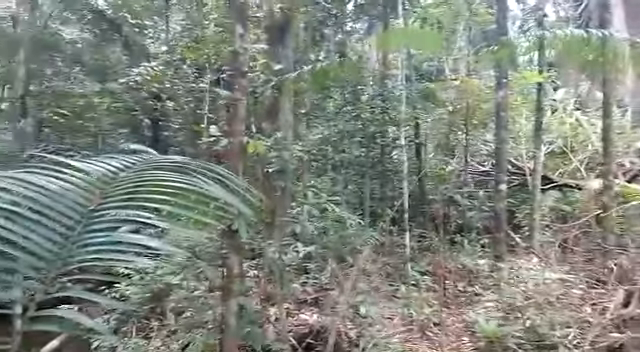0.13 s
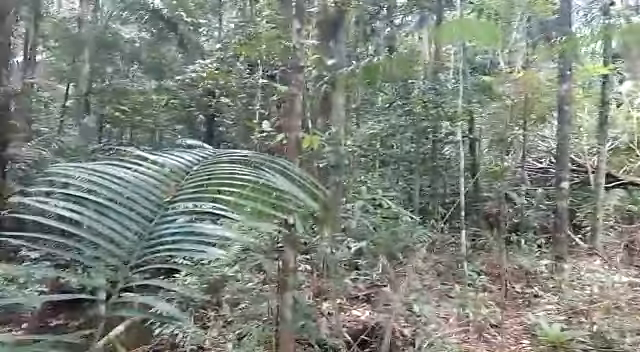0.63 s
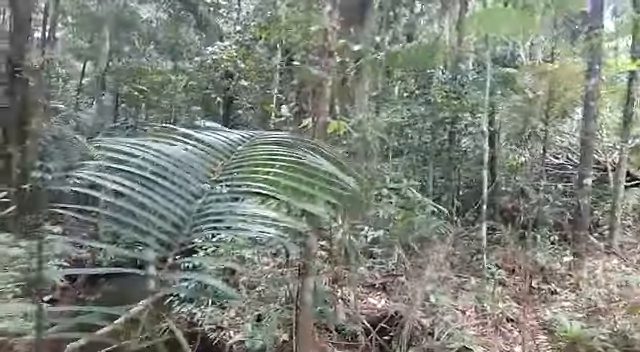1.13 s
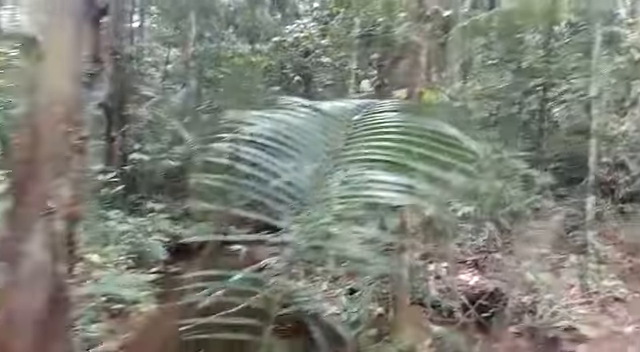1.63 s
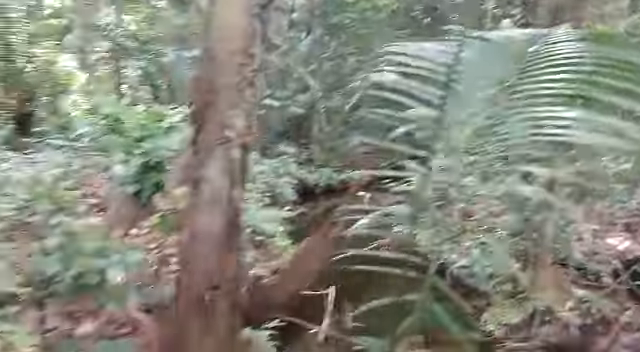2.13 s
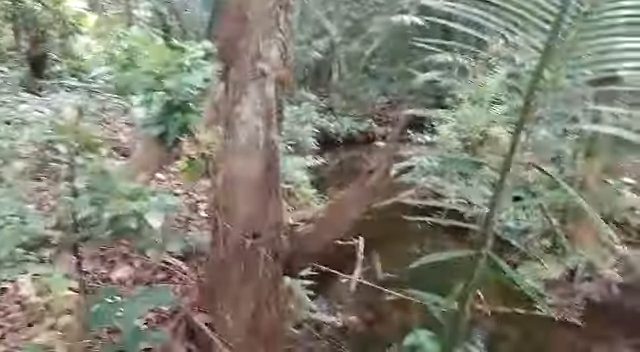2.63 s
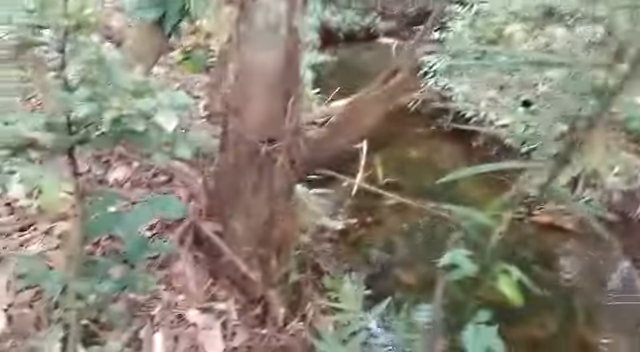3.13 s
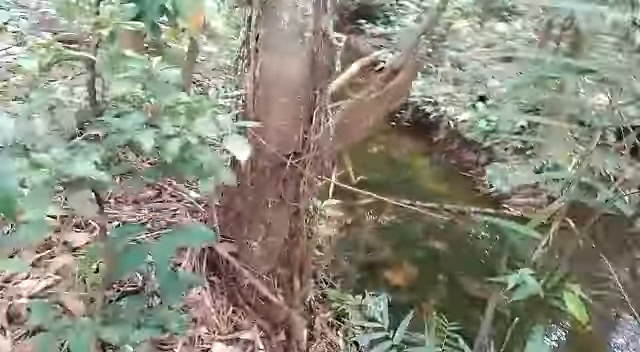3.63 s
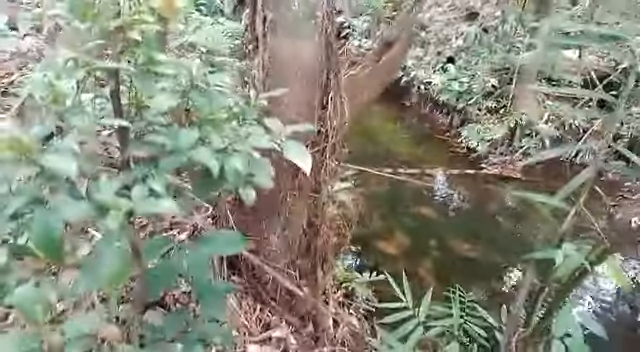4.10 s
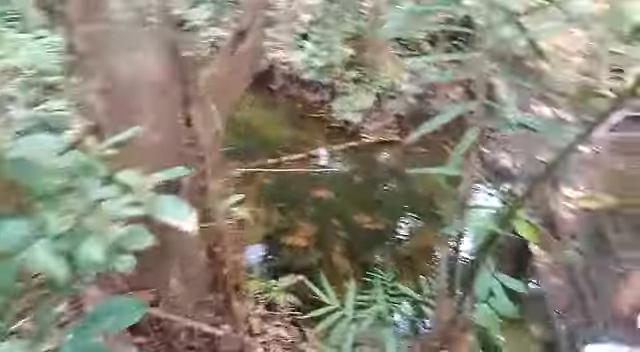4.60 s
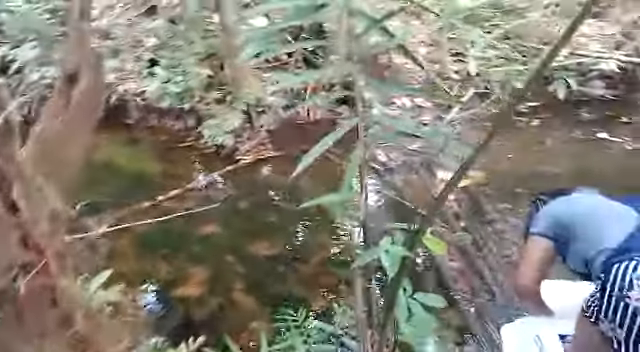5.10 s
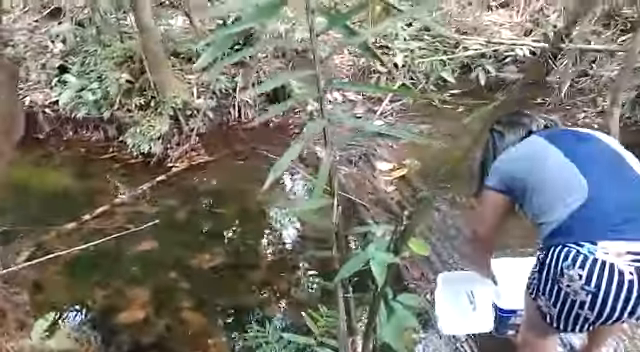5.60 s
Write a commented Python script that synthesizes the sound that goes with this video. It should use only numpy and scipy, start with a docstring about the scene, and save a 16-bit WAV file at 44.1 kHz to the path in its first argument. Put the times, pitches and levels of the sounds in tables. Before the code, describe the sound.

Outdoors in forest undergrowth, uneven swilling of water in a small plastic container comes first, with hollow gulps and bright spray. After a lull, heavy leaf crunches arrive near three and a half, four and five seconds, trailing crackles and twig snaps. Distant hiss and high insects continue; the handheld microphone sounds thin and bright.

```python
"""Water rushes, gulps and booms in a swilled hollow plastic tub: noise and grains ring its modes.
Close by, steps crush dry leaves: short cracks and hiss swell with the load of each foot.
Single twig and leaf snaps, made of rough decaying sines, stand out over the crush.
Far hiss and insects in narrow noise bands lie under it all, out in forest undergrowth.
A small bright microphone hears it, over faint low bass noise that rises with the low near sounds."""
import sys
import numpy as np
from scipy import signal
from scipy.fft import rfft, irfft, next_fast_len
from scipy.io import wavfile
from scipy.ndimage import uniform_filter1d, map_coordinates

SR = 44100
rng = np.random.default_rng(int(sys.argv[2]) if len(sys.argv) > 2 else 0)


def persist_wave(psi):
    """Save psi, clipped to +-1, as 16-bit WAV."""
    counts = np.round(np.clip(psi, -1, 1) * 32767).astype(np.int16)
    wavfile.write(sys.argv[1], SR, np.atleast_2d(counts).T)


def ratio(d):
    """dB to gain"""
    e = np.asarray(d, float) / 20
    return 10 ** e


N = 253134

# far forest hiss: (frequency [Hz], relative density [dB])
FAR_HISS = [(120, -53), (200, -8.5), (366, -3), (964, -10), (1060, -16), (1860, -8.5), (2590, -30.5),
            (5680, -15), (6570, -1.5), (7330, -6.5), (8180, -24), (15800, -19)]
# insect bands that waver in level throughout: (centre [Hz], width [Hz], level [dB])
INSECTS = [(6720, 94, -79), (8300, 550, -70.5)]
# one nearer insect: (time [s], level [dB])
NEAR_INSECT = [(0, -81), (1.8, -79), (2.0, -64), (2.9, -61.5), (3.2, -73.5), (3.5, -72), (5.74, -64)]
# scatter off trunks: (frequency [Hz], 60 dB decay time [s])
TRUNK_DECAY = [(300, 0.15), (3000, 0.088), (12000, 0.05)]

# steps: (first touch [s], time to full weight [s], hold [s], crush [dB], rustle of settling leaves [dB],
# rustle fade [dB/s])
STEPS = [(2.476, 0.066, 0.0068, -52, -55, 60), (3.461, 0.069, 0.0084, -38.5, -53, 27),
         (3.499, 0.055, 0.005, -24, -41.5, 75), (4.234, 0.032, 0.0075, -47, -78, 36),
         (4.299, 0.019, 0.0089, -31, -44.5, 51), (4.969, 0.061, 0.055, -25, -39.5, 25.5)]
# crisp part of the leaves: (frequency [Hz], relative density [dB])
LEAF_CRISP = [(1470, -70), (2500, -10.5), (3860, -6), (4860, -8.5), (9020, 3), (10400, 4), (12700, -11.5),
              (14900, -13), (16100, -8), (16600, -62)]
# duller body of the leaves: (frequency [Hz], relative density [dB])
LEAF_BODY = [(180, -8), (300, -13), (813, -11.5), (968, -14), (1180, -14.5), (1760, -11.5), (3500, -9),
             (4550, -32), (7700, -120)]
# single snaps: (time [s], relative level [dB], ring pitch [Hz], relative knock level [dB])
SNAPS = [(0.053, -40, 4120, -1), (0.5494, -27, 10400, -36), (0.775, -33.5, 9200, -30),
         (0.7901, -27, 9260, -43), (0.802, -29, 9900, -33), (0.949, -28, 10240, -44),
         (1.037, -27.5, 9820, -14), (1.5374, -26, 10160, -39), (1.6518, -30, 9830, -24),
         (1.729, -27.5, 8280, -21), (2.5035, -25.5, 3430, -21), (2.5323, -25.5, 9020, -2),
         (2.6618, -23.5, 10250, -26), (2.978, -52, 9100, 0), (3.03, -46.5, 9600, 0), (3.1, -46, 9500, -10),
         (3.2892, -41.5, 1750, -21), (3.41, -49, 7500, -2), (3.549, -9, 7520, -23),
         (3.6402, -19.5, 9300, -3), (3.6587, -20.5, 10480, -28), (3.7042, -18.5, 8340, -9),
         (3.7386, -13.5, 9690, -41), (3.8564, -27.5, 9060, -3.5), (3.8747, -30, 3670, -33),
         (3.9987, -24.5, 9120, -15), (4.0114, -26, 9500, -4), (4.0292, -29, 9400, -19),
         (4.105, -23.5, 9200, -45), (4.1653, -35.5, 9530, 0.5), (4.335, -19, 6820, -25),
         (4.353, -31, 1480, -17), (4.4264, -16, 10150, -19), (4.43, -7, 9850, -40), (4.51, -36, 7940, -29),
         (4.566, -25.5, 9660, -32), (4.587, -23, 10080, -9.5), (4.652, -25.5, 8280, -38),
         (4.7162, -23.5, 8300, -40), (4.885, -47.5, 2780, -18), (4.907, -54, 7060, -27),
         (4.916, -33.5, 9760, -30), (5.0797, -10.5, 9030, -36), (5.192, -20, 7280, -6),
         (5.2088, -13.5, 10880, -5), (5.229, -19.5, 8070, -26), (5.3062, -22, 9150, -2),
         (5.3265, -13, 9650, -31), (5.33, -14, 9080, -26), (5.342, -18, 10220, -19),
         (5.375, -24, 10700, -23), (5.4119, -27, 8860, 9.5), (5.4306, -25.5, 8900, -3),
         (5.459, -16, 9200, -6), (5.4756, -21.5, 8250, 2), (5.5159, -22.5, 10730, -32),
         (5.545, -26, 9550, -23), (5.594, -34, 9900, -28), (5.6471, -28.5, 10400, -44)]

# swilling strokes, each with rows: (time [s], rush in the middle modes [dB], spray in the high modes [dB]),
# as relative levels
STROKES = [
    [(0.0, -65, -60), (0.036, -69, -66), (0.056, -62.5, -52), (0.2, -63, -55.5), (0.25, -61.5, -50.5),
     (0.68, -57, -48.5), (0.99, -59.5, -51.5), (1.08, -61, -55.5), (1.19, -59, -50.5), (1.31, -57.5, -52),
     (1.46, -62, -58.5)],
    [(1.46, -61, -49), (1.53, -57, -52), (1.69, -58.5, -46.5), (1.8, -56.5, -48), (2.05, -54.5, -51),
     (2.2, -57.5, -54.5), (2.36, -65, -60), (2.42, -64, -69), (2.47, -69, -90)],
    [(2.47, -60, -88), (2.53, -59, -45.5), (2.73, -59, -57.5), (2.92, -58.5, -63), (2.96, -67, -85),
     (3.04, -72, -93), (3.12, -104, -80)],
    [(3.91, -69, -75), (3.932, -41.5, -37), (3.958, -51, -41), (4.172, -69.5, -57.5), (4.2, -100, -58)],
]
# the tub's middle modes as tilt and fill change, one set a stroke: (centre [Hz], width [Hz], level [dB])
TUB_MODES = [
    [(710, 71, 5), (1400, 144, 6), (1850, 150, 5.5), (2485, 144, 6.5), (3020, 320, 0)],
    [(795, 116, 8.5), (1080, 100, 10), (1850, 270, 7.5), (2980, 68, -16), (2300, 1700, 5)],
    [(1264, 240, -5), (1566, 110, 7), (1756, 60, 6), (3370, 250, 1), (4540, 230, -4)],
    [(1090, 37, -1.5), (2020, 95, -10), (2260, 320, -8.5), (3840, 370, -0.5), (4550, 170, -3)],
]
# unsteadiness of the middle modes: one spread [dB] a stroke
MODE_CHURN = [2.5, 2.5, 1.2, 2.2]
# boom of the air inside against the rush: one level [dB] a stroke
AIR_BOOM = [-17, -12.5, -20, -13]
# the tub's high modes: (centre [Hz], width [Hz], level [dB])
SPRAY_MODES = [(5070, 730, -2.5), (5706, 66, -1), (6124, 134, 1), (7430, 46, -29), (7250, 210, -5),
               (9000, 25, 7.5), (8730, 470, 1.5), (8860, 120, -5), (10020, 800, 6.5)]
# finest spray near 11 kHz: (time [s], level against the spray [dB])
SHEEN = [(0, -15), (.7, -21), (.78, -8), (1.4, -24), (1.5, -15), (1.9, -10), (2.05, -4), (2.25, -10),
         (2.9, -37)]
# waves hitting the wall: (crest [s], swell over the rush [dB])
WAVES = [(0.16, 8.5), (0.224, 12), (0.437, 7.5), (0.702, 1), (1.004, 6), (1.124, 15), (1.17, 3.5),
         (1.262, 8.5), (1.492, 6), (1.616, 6), (1.743, 5.5), (1.93, 5.5), (2.082, 10.5), (2.535, 2)]
# pockets of air slapped shut, deep booms to small gulps: (time [s], relative level [dB], pitch [Hz])
GULPS = [(0.049, -42.5, 763), (0.217, -55, 282), (0.219, -42.5, 726), (0.324, -43, 2340),
         (0.436, -49, 2520), (0.635, -46, 485), (0.652, -34.5, 266), (0.7, -40, 736), (0.7, -47.5, 261),
         (0.774, -37, 1790), (0.972, -44.5, 259), (0.997, -49.5, 296), (1.005, -40, 1830),
         (1.053, -57, 475), (1.125, -45, 270), (1.165, -38.5, 1440), (1.223, -54, 267), (1.26, -41, 1850),
         (1.309, -39.5, 1810), (1.317, -52, 267.5), (1.394, -47, 860), (1.475, -44, 1020),
         (1.484, -43, 298), (1.736, -43, 268), (1.927, -44.5, 341), (2.052, -44.5, 1090),
         (2.06, -42.5, 315), (2.099, -40, 307), (2.137, -44.5, 392), (2.263, -52, 530), (2.333, -53, 468),
         (2.338, -37, 3520), (3.924, -37.5, 292), (4.692, -52.5, 272)]

# tone of all that is heard, bright on top, with a dip near 170 Hz and a steep end above 16 kHz:
# (frequency [Hz], gain [dB])
HEARD_TONE = [(60, -1), (170, -13), (230, -6), (11000, 2), (13000, 4), (15800, -4), (16300, -50)]
# faint low bass noise: (frequency [Hz], relative density [dB])
BASS_NOISE = [(20, 4.5), (60, 1), (100, 5.5), (140, -11), (200, -29), (400, -120)]


def unit(x):
    """Scales a sound to rms 1."""
    return x / np.sqrt(np.mean(x ** 2) + 1e-20)


def along(points, hz):
    """Reads (frequency [Hz], value) points on a log frequency axis."""
    f, v = np.transpose(points)
    return np.interp(np.log(hz + 1), np.log(f + 1), v)


def curves(rows):
    """One value per sample for each column, and a soft gate that is shut outside the table."""
    s, *columns = np.transpose(rows)
    t = np.arange(N) / SR
    inside = ((t >= s[0]) & (t <= s[-1])) * 1.
    gate = uniform_filter1d(inside, size=600, mode="nearest")
    return [np.interp(t, s, column) for column in columns], gate


def wobble(rate):
    """A smooth random curve with the given number of knots a second."""
    return map_coordinates(rng.standard_normal(N // 100), [np.arange(N) * rate / SR])


def filtered(x, response):
    """Shapes a sound by a complex response of frequency."""
    m = next_fast_len(N + 8192)
    return irfft(rfft(x, m) * response(np.fft.rfftfreq(m, 1 / SR)), m)[:N]


def bass_cut(x, hz):
    """Second-order high-pass, as for a source too small to radiate much bass."""
    return filtered(x, lambda f: (1j * f / (hz + 1j * f)) ** 2)


def modes(table):
    """Causal response of a set of resonances, alternating in sign."""
    def response(f):
        total = 0
        for k, (centre, width, db) in enumerate(table):
            loss = 1j * f * width
            total = total + (-1) ** k * ratio(db) * loss / (centre * centre - f * f + loss)
        return total
    return response


def noise():
    """Fresh white noise."""
    return rng.standard_normal(N)


def grains(centre_hz, spread, cycles, uneven_db, count, size=96):
    """Scattered short damped sines of log-normal pitch and long-tailed size, rms 1."""
    when, z, e = rng.random(count), rng.standard_normal(count), rng.exponential(size=count)
    hz = np.clip(centre_hz * np.exp(spread * z), 700, 15000)[:, None]
    k = np.arange(size)
    turns = hz * k / SR
    gain = ratio(uneven_db * np.minimum(e, 4.5))[:, None]
    fade = np.exp(-turns / cycles) * np.cos(np.pi * k / size / 2)
    wave = gain * np.sin(2 * np.pi * turns) * fade
    at = (when * N).astype(int)[:, None] + k
    return unit(np.bincount(at.ravel(), wave.ravel(), N + size)[:N])


def rough_sine(hz, t, steps, roughness):
    """A sine whose phase wanders in random steps of the given size [rad]."""
    return np.sin(2 * np.pi * hz * t + roughness * np.cumsum(steps))


def add(track, s, sound):
    """Mixes a sound in at a time."""
    part = track[round(s * SR):][:len(sound)]
    part += sound[:len(part)]


def narrow_band(hz, width):
    """Noise rung through one resonance twice, rms 1."""
    return unit(filtered(noise(), lambda f: modes([(hz, width, 0)])(f) ** 2))


def forest():
    """Smooth far hiss, with insects singing in narrow unsteady bands."""
    hiss = unit(filtered(noise(), lambda f: ratio(along(FAR_HISS, f))))
    far = ratio(-67.5 + 3.3 * wobble(3.43)) * hiss
    (near_db,), _ = curves(NEAR_INSECT)
    chorus = sum(ratio(db + 2.1 * wobble(12)) * narrow_band(hz, width) for hz, width, db in INSECTS)
    return far + chorus + ratio(near_db + 0.96 * wobble(12)) * narrow_band(9000, 190)


def trunks(x):
    """Scatter off trunks: a short diffuse tail of noise, treble dying first."""
    hz, t, z = signal.stft(rng.standard_normal(SR // 4), SR, nperseg=256)
    decay = ratio(-60 * t / along(TRUNK_DECAY, hz)[:, None])
    tail = signal.istft(z * decay, SR, nperseg=256)[1]
    return signal.fftconvolve(x, tail / np.linalg.norm(tail))[:N]


def patchy(x, depth_db):
    """Random gain patches over time and pitch: different leaves sound in turn."""
    z = signal.stft(x, nperseg=256)[2]
    field = uniform_filter1d(rng.standard_normal(z.shape), size=5, axis=0)
    field = uniform_filter1d(field, size=3, axis=1)
    return unit(signal.istft(z * ratio(depth_db * unit(field)), nperseg=256)[1][:N])


def footfalls(crush_db, curve, settle_db, fade):
    """Gain of all steps: touch, load, hold and release, then leaves that settle slowly."""
    touch_db, touch_s = -68, 0.0035  # level before crush_db, and rise, of the first touch
    release_db_per_s, settle_s, rest_db = 445, 0.19, -70.5
    t, power = np.arange(N) / SR, 0
    for s, rise, hold, peak, rustle, db_per_s in STEPS:
        load = np.clip((t - s) / rise, 0, 1) ** curve
        touch = min(touch_db, peak)
        since_hold = t - s - rise - hold
        press = touch + (peak - touch) * load - release_db_per_s * np.maximum(since_hold, 0)
        settle = rustle - fade * db_per_s * np.maximum(since_hold - settle_s, 0)
        begun = np.clip((t - s) / touch_s, 0, 1)
        power = power + (begun * ratio(press + crush_db)) ** 2
        power = power + (load ** 2 * ratio(settle + settle_db)) ** 2
    rest = ratio(rest_db + settle_db) ** 2 * (t > STEPS[0][0])
    return np.sqrt(power + rest)


def leaves():
    """Dense one-cycle cracks over a fine hiss; the slow bending of leaves gives a duller body."""
    level = footfalls(0, 0.37, 0, 1)
    bend = footfalls(-11.5, 0.23, -12.5, 2.05)  # the body leads the cracks and fades faster
    # a hard crush merges the cracks into a roar
    dense = np.clip((20 * np.log10(level + 1e-9) + 42) / 20, 0, 1)
    cracks = grains(7550, 0.47, cycles=0.68, uneven_db=5.0, count=10000)
    mix = ((0.7 + 0.6 * dense) * noise() + cracks) / (1 + .5 * dense)
    crisp = patchy(filtered(mix, lambda f: ratio(along(LEAF_CRISP, f))), depth_db=2.5)
    dull = grains(1740, 0.31, cycles=9.9, uneven_db=1, count=4000)
    dull_mix = 3.27 * noise() + dull + .5 * cracks
    body = patchy(filtered(dull_mix, lambda f: ratio(along(LEAF_BODY, f))), depth_db=1.5)
    # cracks come in bunches, less so in a dense crush
    clumps_db = np.clip(1 - 0.62 * dense, .2, 1) * (2.06 * wobble(54) + 0.68 * wobble(180))
    crush = ratio(clumps_db) * (level * crisp + bend * body)
    return bass_cut(crush, 450)  # leaves radiate little bass


def snaps():
    """Each snap is a crack of rough ringing, a duller knock, and a fizz of splinters."""
    out, t = np.zeros(N), np.arange(SR // 20) / SR
    rise = 1 - np.exp(-t / 0.0003)
    ring_t60, knock_t60, splinter_t60 = 0.0068, 0.0031, 0.021  # [s]
    for s, db, hz, knock_db in SNAPS:
        chance = rng.standard_normal((3, len(t)))
        ring = rough_sine(hz, t, chance[0], 0.33) * ratio(-60 * t / ring_t60)
        knock = rough_sine(3200, t, chance[1], 0.47) * ratio(knock_db + 2.5 - 60 * t / knock_t60)
        fizz = ratio(-60 * t / splinter_t60 + 0.75 * chance[0])
        splinters = 0.26 * rough_sine(hz, t, chance[2], 0.634) * fizz
        add(out, s, ratio(db + 3.5) * rise * (ring + knock + splinters))
    # little bass from thin leaves, little above their ring
    return bass_cut(filtered(out, lambda f: 0.048 + 1 / (1 + (f / 12000) ** 8)), 1100)


def sloshed(x, table, own_db, drift):
    """Each mode swells and fades by itself, and all slide a little in pitch as the water shifts."""
    rings = 0
    for k, mode in enumerate(table):
        rings = rings + ratio(own_db * wobble(16)) * filtered(x, modes([mode])) * (-1) ** k
    slide = np.cumsum(1 + drift * wobble(3.3))
    return unit(map_coordinates(rings, [slide * (N - 1) / slide[-1]], mode="reflect"))


def tub_spray(splash):
    """Fine spray excites the high modes, with a sheen of the finest spray on top."""
    bright = filtered(splash, lambda f: modes([(7500, 6000, 0)])(f) / (1 + (f / 10600) ** 16))
    spray = sloshed(bright, SPRAY_MODES, own_db=3, drift=.014)
    (sheen_db,), _ = curves(SHEEN)
    sheen = unit(filtered(splash, lambda f: modes([(11000, 1600, 0)])(f) ** 3))
    return spray + ratio(sheen_db) * sheen


def wave_swell():
    """Each wave hitting the wall lifts the level in a quick triangle [dB]."""
    t, rise_s, fall_s = np.arange(N) / SR, 0.024, 0.026
    return sum(db * np.interp(t, [s - rise_s, s, s + fall_s], [0, 1, 0]) for s, db in WAVES)


def swilling():
    """Turbulent water excites the tub's modes stroke by stroke, and its slaps boom the air inside."""
    out = np.zeros(N)
    splash = noise() + 0.61 * grains(3150, 0.53, cycles=0.48, uneven_db=7.5, count=9000)
    # sparse bubbles and knocks of water on the wall
    slaps = noise() + 0.39 * grains(1710, 0.459, cycles=5.9, uneven_db=2.5, count=1200, size=400)
    boom = narrow_band(285, 110)
    spray = tub_spray(splash)
    surge = wobble(18)  # the water surges unevenly, in all modes at once
    wave_db = wave_swell()
    for rows, shape, churn_db, air_db in zip(STROKES, TUB_MODES, MODE_CHURN, AIR_BOOM):
        (rush_db, spray_db), gate = curves(rows)
        boom_db = rush_db + air_db + 1.5 * wave_db  # waves swell the boom most, the spray least
        rush = sloshed(slaps, shape, own_db=churn_db, drift=0.018)
        out += gate * ratio(rush_db + wave_db + 1.12 * surge) * rush
        out += gate * ratio(spray_db - 3.0 + 0.66 * wave_db + 0.22 * surge) * spray
        out += gate * ratio(boom_db + 4 * wobble(25)) * boom
    return out


def gulps():
    """Air pockets slapped shut ring briefly at one pitch, over a broad dull knock of the wall."""
    out, t = np.zeros(N), np.arange(SR // 5) / SR
    knock_hz, knock_db, knock_t60 = 719, -10.5, 0.052  # level against the table's, decay [s]
    for s, db, hz in GULPS:
        t60 = 0.054 * (1000 / hz) ** 0.87  # [s], high gulps die sooner
        chance = rng.standard_normal((2, len(t)))
        swell = 1 - np.exp(-t * hz / 0.68)
        gulp = rough_sine(hz, t, chance[0], 0.041)  # moving water keeps the pitch unsteady
        add(out, s, ratio(db + 0.5 - 60 * t / t60) * swell * gulp)
        thud = rough_sine(knock_hz, t, chance[1], 0.28)  # the wall takes the slap
        add(out, s, ratio(db + knock_db - 60 * t / knock_t60) * (1 - np.exp(-t / 0.0034)) * thud)
    return out


def tub():
    """Swilling and gulps together; a small tub radiates no deep bass."""
    return bass_cut(swilling() + gulps(), 130)


def scene():
    """All sources, the near ones with their scatter."""
    near = tub() + leaves() + snaps()
    return (near + ratio(-9.0) * trunks(near) + forest())[None]


def roll_off(x):
    """The treble ends steeply here."""
    return signal.sosfilt(signal.butter(12, 16820, fs=SR, output="sos"), x)


def record(dry):
    """A small microphone, bright on top, with a dip near 170 Hz, and bass noise that follows low sounds."""
    heard = filtered(dry[0], lambda f: ratio(along(HEARD_TONE, f)))
    low = filtered(heard, modes([(300, 150, 0)]))
    low_level = np.sqrt(np.abs(uniform_filter1d(low ** 2, size=2000)))
    level = ratio(-28) * low_level + ratio(-93)  # part that follows the low sounds, then a constant floor
    texture = unit(filtered(noise(), lambda f: ratio(along(BASS_NOISE, f))))
    bass = ratio(3.1 * wobble(19)) * level * texture
    return roll_off((heard + bass)[None])


dry = scene()
out = record(dry)
persist_wave(out)
```